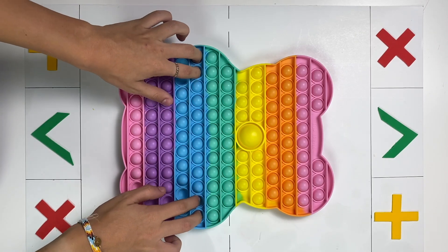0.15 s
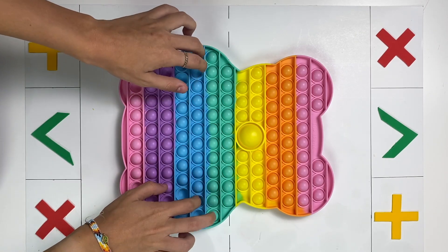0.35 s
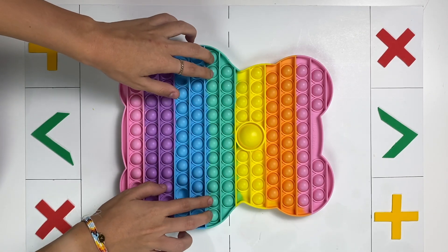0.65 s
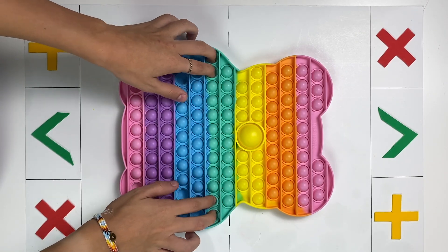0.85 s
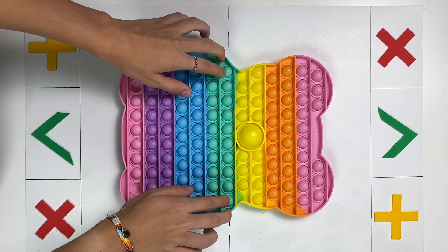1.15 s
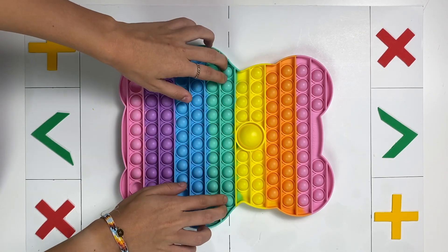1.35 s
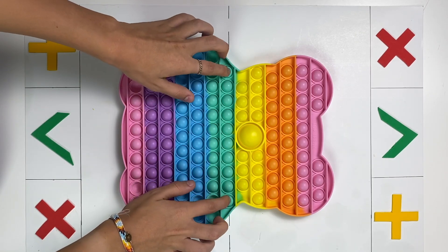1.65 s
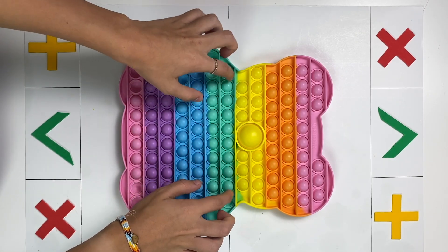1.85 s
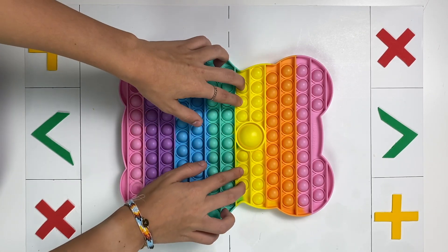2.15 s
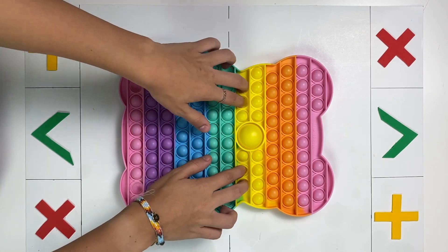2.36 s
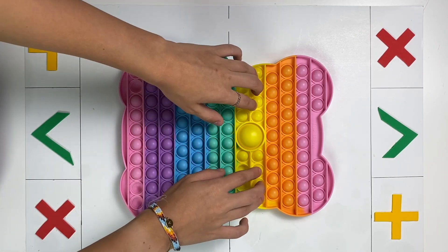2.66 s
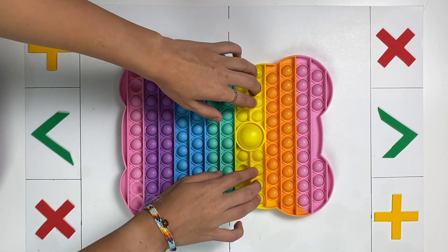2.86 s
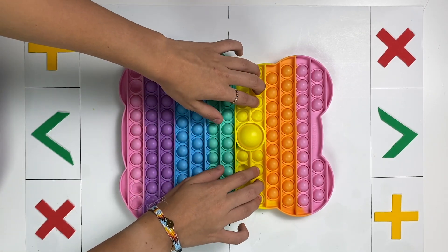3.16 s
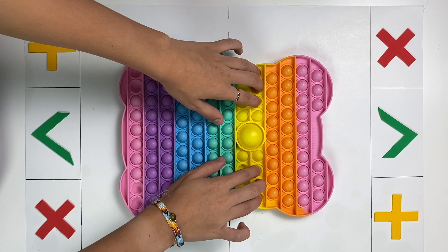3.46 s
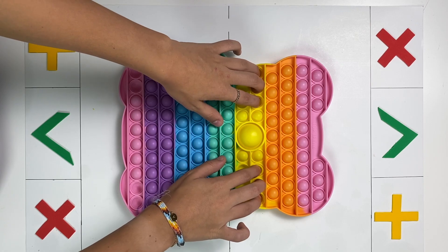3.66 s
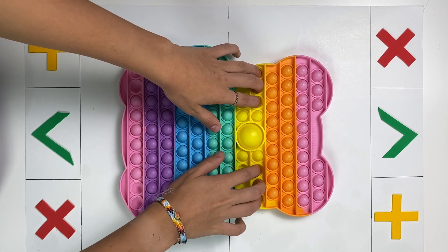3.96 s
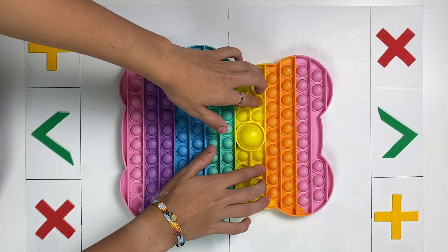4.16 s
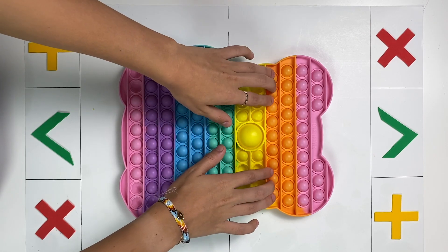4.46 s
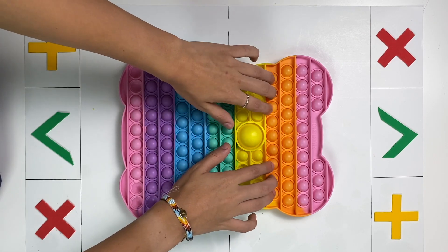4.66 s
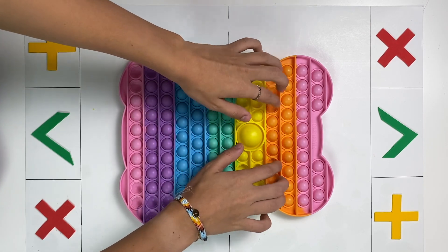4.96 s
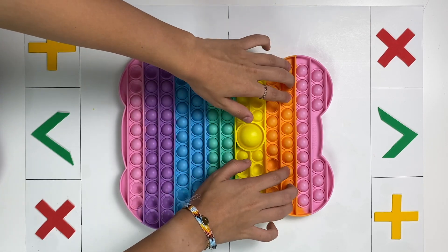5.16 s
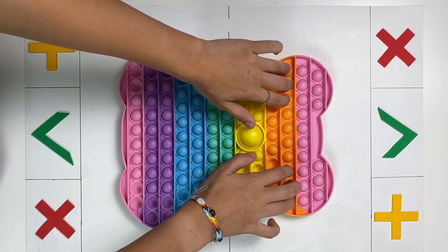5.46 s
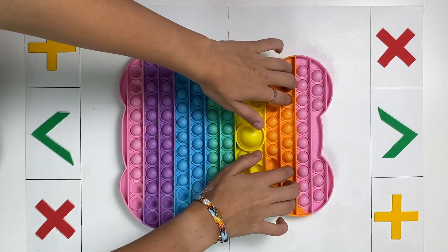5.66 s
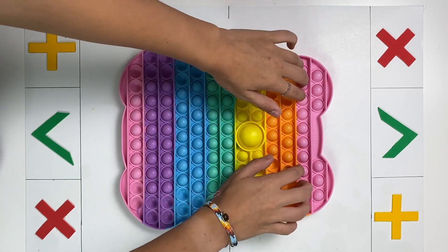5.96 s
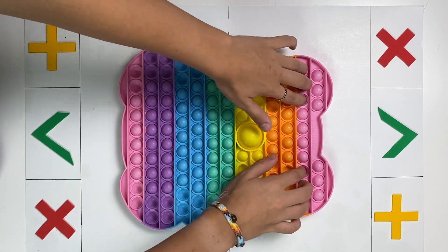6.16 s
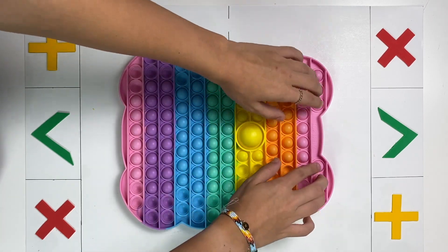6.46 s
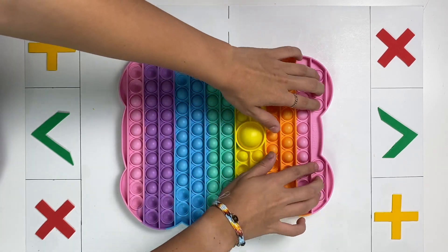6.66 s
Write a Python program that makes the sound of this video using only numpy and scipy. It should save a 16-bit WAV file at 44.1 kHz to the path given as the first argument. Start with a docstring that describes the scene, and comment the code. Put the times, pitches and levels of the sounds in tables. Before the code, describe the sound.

A quick run of three pops opens, then single snaps and small clusters follow unevenly as hands work across a rubber bubble sheet on a table. The pops are short, dry and hollow, with bright clicky edges and a brief small-room echo. Soft fingertip touches, tiny ticks and barely audible squeaks fill the gaps over a very quiet steady hum and hiss. Heard from close by in stereo.

```python
"""Pop-it toy in a small room

Two hands press the bubbles of a large silicone pop-it toy lying on a table. Each dome crackles as it
buckles, snaps through with a falling chirp (swept sine), rings its air pocket (damped sines) and thumps
the sheet (a sum of modes). Fingers tick, land and squeak on the rubber (shaped noise). A motor hums
faintly (wavering sines) over low rumble and hiss; decaying noise bands give the room's echo."""
import sys
import numpy as np
from scipy import signal
from scipy.fft import rfft, irfft
from scipy.io import wavfile
from scipy.ndimage import uniform_filter1d

SR = 44100
rng = np.random.default_rng(int(sys.argv[2]) if len(sys.argv) > 2 else 0)


def pcm_store(signal):
    """Save signal as 16-bit PCM."""
    levels = np.round(np.clip(np.atleast_2d(signal), -1, 1) * 32767)
    wavfile.write(sys.argv[1], SR, levels.astype(np.int16).T)


N = 300321  # length [samples]

# Levels in the tables are relative: most layers add an offset of their own.
# motor hum partials: (frequency [Hz], level [dB])
HUM = [(102.3, -61), (204.6, -72.5), (312.2, -86.5)]
# spectrum of the room's low rumble and hiss: (frequency [Hz], relative density [dB per Hz])
AIR = [(20, -26), (45, -24.5), (70, -9), (95, 4), (120, -14), (160, -13), (200, -11.5), (250, -18),
       (400, -26.5), (650, -32.5), (1000, -38.5), (2500, -48), (8000, -52.5), (16000, -58.5)]
# echo of the room by band: (frequency [Hz], level [dB], decay by 60 dB [s])
ROOM = [(100, -14, 0.59), (200, -8, 0.37), (350, -9, 0.45), (590, -6, 0.35), (1110, -2.5, 0.3),
        (1960, -5, 0.35), (3880, -6.5, 0.34), (8160, -6.5, 0.43), (15100, -8.5, 0.47)]
# fingertips shifting on the sheet between presses: (time [s], level [dB])
TOUCHES = [(.576, -52.5), (2.873, -54.5), (2.993, -58), (4.172, -65.5), (4.461, -61.5), (4.57, -57.5),
           (4.926, -44.5), (5.297, -49), (5.717, -45.5), (5.834, -56)]
# skin sliding on the rubber in faint squeaks:
# (time [s], length [s], centre [Hz], resonance width [Hz], level [dB])
RUBS = [(1.44, .13, 6680, 900, -83), (2.852, 0.027, 4970, 505, -75.5), (3.435, 0.23, 7710, 130, -62.5),
        (3.986, 0.071, 3384, 401.5, -79.5), (4.517, .1, 6620, 698, -79.5), (5.02, 0.08, 4770, 493, -86)]
# colour of a soft pad landing: (frequency [Hz], level [dB])
PAD = [(60, -21), (180, 4.5), (400, 3.5), (650, 3.5), (1100, -3.5), (1800, -16), (4000, -28), (12000, -42)]
# skin and nails ticking on the rubber: (time [s], level [dB])
TICKS = [(.061, -47), (.0874, -28), (.348, -53), (.577, -63), (1.033, -39), (4.12, -57), (4.752, -36),
         (4.927, -48.5), (5.717, -52.5), (6.616, -61.5)]
# colour of the rubber's crackle: (frequency [Hz], level [dB])
CRACKLE = [(500, -20), (1500, 5), (2800, -1), (3600, -1), (4400, 1), (5600, -5.5), (7200, 3.5), (9500, -7),
           (13000, -5), (16000, -11.5)]
# the hands take a new grip and press: (time [s], pad landing [dB], pitch of a firm snap [Hz],
# sheet thump [dB], upper ring relative to pocket ring [dB], extra crackle [dB])
PRESSES = [(.069, -34.5, 1350, -38, 4.5, 2.5), (.348, -64, 1400, -45.5, -3, -2),
           (.823, -40.5, 1300, -39, 3.5, 1), (1.033, -51, 1400, -33, -6, -11),
           (1.696, -43, 1341, -39, -3, 4), (2.338, -56.5, 1450, -43.5, -3.5, 0.5),
           (3.302, -60.5, 1400, -45, -7, 1), (3.721, -44, 1640, -37, -7.5, -0.5),
           (4.709, -47.5, 1620, -40.5, 2, -0.5), (5.494, -48.5, 1180, -35, -9.5, 1),
           (6.112, -43.5, 1230, -38.5, -4.5, 3.5)]
# domes snapping through: (time [s], snap level [dB], pocket ring level [dB], settled pocket pitch [Hz])
POPS = [(0.0775, -23.5, -31.5, 705), (0.1209, -21.5, -29, 617), (0.1689, -13, -24.5, 493),
        (.359, -44.5, -32, 620), (.832, -31, -41, 634), (.857, -11.5, -18, 620), (0.9142, -13, -26, 457),
        (1.0432, -27, -28, 577), (1.7285, -17, -30, 618), (2.3615, -26.5, -32, 496),
        (2.3826, -14, -26.5, 620), (2.395, -16, -27.5, 626), (3.3887, -30, -29, 555),
        (3.5065, -24, -34, 680), (3.5137, -20, -29.5, 471), (3.7243, -24.5, -35, 488),
        (3.7288, -16, -31, 467), (4.727, -31.5, -37.5, 616), (4.7574, -19, -24.5, 667),
        (4.7896, -17, -24.5, 642), (4.8192, -15.5, -30.5, 467), (5.497, -34, -45.5, 624),
        (5.505, -14.5, -29.5, 474), (5.5283, -13, -25.5, 678), (6.1197, -25.5, -27, 644),
        (6.1727, -15, -32.5, 510), (6.1766, -15.5, -29, 670), (6.1828, -21.5, -37.5, 785),
        (6.1922, -27.5, -28.5, 550)]
# colour of the dome's skin as it snaps: (frequency [Hz], level [dB])
SKIN = [(200, -1), (700, 0), (1100, 2), (1600, -1.5), (2100, -2), (2800, -0.5), (3600, 3.5), (4400, 7),
        (5000, 10), (5800, 1.5), (7500, 3), (12000, -3)]
# colour of the loose rubber shuddering around a flipped dome: (frequency [Hz], level [dB])
SHUDDER = [(150, -16), (500, -6), (900, -0.5), (2200, -1), (3200, -9), (6000, -24.5), (14000, -36.5)]
# modes of the sheet on the table: (frequency [Hz], level [dB], decay by 60 dB [s])
SHEET = [(152, -2.5, 0.13), (184, 2, 0.2), (271.5, 0.5, 0.16), (381.4, -3, 0.14), (450, 1, 0.08)]

AIR_DB = -61.5
TOP_HZ = 16000
LEAD_S = 0.006  # a dome creaks this long before it gives way
POCKET_T60_S, UPPER_T60_S = 0.023, 0.014  # ring times of the air pocket's two resonances
# a dome that snaps with FIRM_DB has this base crackle; a harder snap is higher and crackles more
FIRM_DB, CRACKLE_DB = -21, -32
SNAP_OCTAVES_PER_DB, CRACKLE_DB_PER_DB = 0.007, 0.79
# fainter random brushes of the fingers: level of the pad, level of the tick, and their spread either way
BRUSH_PAD_DB, BRUSH_TICK_DB, BRUSH_SPREAD_DB = -67, -75.5, 3


def undb(db):
    """Logarithmic level: 20 dB is a factor of ten in amplitude."""
    return 10 ** (np.asarray(db) / 20)


def seconds(length):
    """Sampling: a time axis [s] of the given length."""
    return np.arange(int(length * SR)) / SR


def add(track, at, sound):
    """Superposition: mix a sound into a track at a time, cut at the track's end."""
    start = int(at * SR)
    track[..., start:start + sound.shape[-1]] += sound[..., :track.shape[-1] - start]


def colour(x, points):
    """Linear filtering: weight a spectrum by (Hz, dB) points joined on a log frequency axis."""
    hz, db = np.transpose(points)
    f = np.maximum(np.fft.rfftfreq(len(x), 1 / SR), 1)
    gain = undb(np.interp(np.log(f), np.log(hz), db))
    return irfft(rfft(x) * gain, len(x))


def noise(points, size):
    """Coloured noise: white noise shaped by (Hz, dB) points and scaled to unit deviation."""
    x = colour(rng.standard_normal(size), points)
    return x / x.std()


def walk(rate):
    """Slow random modulation: levels held 1 / rate seconds, then smoothed twice."""
    hold = int(SR / rate)
    steps = np.repeat(rng.standard_normal(N // hold + 1), hold)
    x = uniform_filter1d(uniform_filter1d(steps, hold), hold)[:N]
    return x / x.std()


def damping(t, t60):
    """Exponential decay: the amplitude falls by 60 dB in t60 seconds."""
    return np.exp(-np.log(1000) * t / t60)


def background(hum_db, waver_db, air_db, side_db):
    """Tonal and broadband noise: a motor hum wavering in level and phase, over low rumble and hiss."""
    t = np.arange(N) / SR
    hum = np.zeros(N)
    for hz, db in HUM:
        level = undb(db + hum_db + waver_db * walk(5.6))
        hum += level * np.sin(2 * np.pi * hz * t + 0.27 * walk(10))
    rumble = noise(AIR, size=N)
    # only the upper part of the air noise differs between the channels
    high_pass = signal.butter(1, 1400, "high", fs=SR, output="sos")
    side = signal.sosfilt(high_pass, noise(AIR, size=N))
    return hum + undb(AIR_DB + air_db) * (rumble + undb(side_db) * side * np.array([[1], [-1]]))


def room(onset=0.00097, early_db=6, early_decay=0.018, alike_hz=900):
    """Reverberation: noise bands decay, strongest early from the table and near walls; bass is alike."""
    t = seconds(0.5)
    f = np.maximum(np.fft.rfftfreq(len(t), 1 / SR), 1)
    hz, db, t60 = np.transpose(ROOM)
    mid, side = rfft(rng.standard_normal((2, len(t))))
    apart = f / (f + alike_hz)
    ears = (mid + np.array([[1], [-1]]) * apart * side) / np.sqrt(1 + apart ** 2)
    build = (1 + undb(early_db) * np.exp(-t / early_decay)) * (1 - np.exp(-(t / onset) ** 2))
    echo = 0
    for k, share in enumerate(np.eye(len(ROOM))):
        fade = build * damping(t, t60[k])
        # overlapping triangular bands on a log frequency axis
        band = irfft(ears * np.interp(np.log(f), np.log(hz), share), len(t))
        echo = echo + undb(db[k]) * band * fade / np.sqrt(np.sum(fade ** 2))
    return echo


def ports(x, turn_hz=8300, width_hz=720):
    """Delay and all-pass: the right port hears one sample later, its phase turning at a resonance."""
    b, a = signal.iirpeak(turn_hz, turn_hz / width_hz, fs=SR)
    late = np.append(0, x[:-1])
    return np.array([x, late - 2 * signal.lfilter(b, a, late)])


def heard(x):
    """Radiation: the toy radiates little bass and reaches the ports directly and through the room."""
    radiated = signal.sosfilt(signal.butter(2, 105, "high", fs=SR, output="sos"), x)
    out = signal.fftconvolve(radiated[None], room(), axes=1)
    add(out, 0, ports(radiated))
    return out


def brushes(count):
    """Random arrivals: one light contact in each equal span, as (s, dB about the usual level)."""
    chance = rng.random((count, 2))
    contacts = []
    for k, (when, size) in enumerate(chance):
        contacts.append(((k + when) / count * N / SR, BRUSH_SPREAD_DB * (2 * size - 1)))
    return contacts


def pad(t, rise, decay):
    """Soft impact: dull noise that swells and dies exponentially."""
    return noise(PAD, size=len(t)) * (1 - np.exp(-t / rise)) * np.exp(-t / decay)


def squeak(length, hz, width):
    """Friction exciting a resonance: noise through two equal narrow filters, under a smooth swell."""
    size = len(seconds(length))
    b, a = signal.iirpeak(hz, hz / width, fs=SR)
    tone = signal.lfilter(b, a, signal.lfilter(b, a, rng.standard_normal(size)))
    return np.hanning(size) * tone / tone.std()


def fingers(touches):
    """Impact and friction: pads land dully on the sheet and skin slides over it."""
    out = np.zeros(N)
    t = seconds(0.1)
    for at, db in touches:
        add(out, at, undb(db) * pad(t, rise=0.003, decay=0.008))
    for at, length, hz, width, db in RUBS:
        add(out, at, undb(db) * squeak(length, hz, width))
    return heard(out)[:, :N]


def crackles(bursts, rise, decay, echo_db):
    """Adhesive release: rubber peels off rubber or skin in a brief bright burst at every pop and tick."""
    t = seconds(0.03)
    swell = np.exp(-np.maximum((LEAD_S - t) / rise, (t - LEAD_S) / decay))
    near, radiated = np.zeros((2, N))
    for at, db in bursts:
        add(near, max(at - LEAD_S, 0), undb(db) * swell * noise(CRACKLE, size=len(t)))
        # the room gathers the burst from all directions, so its spectrum evens out to one smooth click
        radiated[int(at * SR)] += undb(db + echo_db) * np.linalg.norm(swell)
    echo = signal.fftconvolve(colour(radiated, CRACKLE)[None], room(), axes=1)
    return ports(near) + echo[:, :N]


def ring(t, hz, t60, rise):
    """Damped resonance: a decaying sine that takes a moment to build."""
    return np.sin(2 * np.pi * hz * t) * damping(t, t60) * (1 - np.exp(-t / rise))


def sheet(t, spread_db):
    """Modal superposition: the sheet's modes, weighted and tuned a little anew at every strike."""
    chance = rng.standard_normal((len(SHEET), 2))
    out = np.zeros(len(t))
    for (hz, db, t60), (weight, tuning) in zip(SHEET, chance):
        out += undb(db + spread_db * weight) * ring(t, hz * (1 + 0.0099 * tuning), t60, rise=0.00045)
    return out


def pocket(t, hz, t60, rise, sag, sag_time):
    """Cavity resonance: the air under a dome starts sharp and settles as the dome comes to rest."""
    phase = 2 * np.pi * hz * (t + sag * sag_time * (1 - np.exp(-t / sag_time)))
    return np.sin(phase) * damping(t, t60) * (1 - np.exp(-t / rise))


def snap(t, hz, crest, decay, glide, sink):
    """Snap-through buckling: a chirp swells to its crest and falls in pitch as the pocket opens."""
    age = t - crest
    pitch = hz * (sink + (1 - sink) * np.exp(-age / glide))  # equals hz at the crest
    phase = 2 * np.pi * np.cumsum(np.minimum(pitch, SR / 4)) / SR
    attack = np.sin(np.pi / 2 * t / crest) ** 2
    release = 1 / np.cosh(np.clip(age / decay, 0, 20))
    swell = np.where(age < 0, attack, release)
    return swell * np.sin(phase - np.interp(crest, t, phase))


def pop(snap_db, snap_hz, pocket_db, pocket_hz, upper_db, thump_db):
    """Instability and free vibration: a dome creaks, snaps, rings its air and shakes the sheet."""
    t = seconds(0.25)
    flip = np.zeros(len(t))
    chirp = snap(t, snap_hz, crest=0.001034, decay=0.00045, glide=0.00041, sink=0.63)
    add(flip, LEAD_S - 0.0006, undb(snap_db + 1.0) * chirp)
    out = colour(flip, SKIN)
    # the fingertip covers each dome differently
    upper_hz = 1030 * (1 + 0.05 * rng.standard_normal())
    creak = pad(t, rise=0.0014, decay=0.025)
    add(out, LEAD_S / 4, undb(snap_db - 29.5) * creak)
    shudder = noise(SHUDDER, size=len(t)) * np.exp(-t / 0.0041)
    add(out, LEAD_S, undb(snap_db - 19.5) * shudder)
    lower_ring = pocket(t, pocket_hz, POCKET_T60_S, rise=0.0013, sag=0.088, sag_time=0.00043)
    add(out, LEAD_S, undb(pocket_db + 7.5) * lower_ring)
    upper_ring = pocket(t, upper_hz, UPPER_T60_S, rise=0.0002, sag=0.14, sag_time=0.0016)
    add(out, LEAD_S, undb(upper_db + 6) * upper_ring)
    add(out, LEAD_S, undb(thump_db - 5.5) * sheet(t, spread_db=3.0))
    add(out, LEAD_S, undb(thump_db + 5.5) * pad(t, rise=0.00055, decay=0.009))
    return out


def grip(at):
    """Boundary conditions: snap pitch, thump, upper ring and extra crackle of the press under way."""
    return [row[2:] for row in PRESSES if row[0] <= at + LEAD_S][-1]


def pops():
    """Position-dependent response: the grip sets each dome's shake, its spot a pattern of echoes."""
    out = np.zeros((2, N))
    for at, snap_db, pocket_db, pocket_hz in POPS:
        firm_hz, thump_db, upper_db, _ = grip(at)
        snap_hz = firm_hz * 2 ** (SNAP_OCTAVES_PER_DB * (snap_db - FIRM_DB))
        dome = pop(snap_db, snap_hz, pocket_db, pocket_hz, pocket_db + upper_db, thump_db)
        add(out, at - LEAD_S, heard(dome))
    return out


def scene():
    """Superposition of sources: the toy close by, and the room's hum and air."""
    light = brushes(count=12)
    landings = [row[:2] for row in PRESSES]
    touches = landings + list(TOUCHES) + [(at, BRUSH_PAD_DB + db) for at, db in light]
    peels = []
    for at, snap_db, *_ in POPS:
        harder_db = CRACKLE_DB_PER_DB * (snap_db - FIRM_DB)
        peels.append((at, CRACKLE_DB + grip(at)[-1] + harder_db))
    ticks = list(TICKS) + [(at, BRUSH_TICK_DB + db) for at, db in light]
    toy = pops() + crackles(peels + ticks, rise=0.00041, decay=0.0015, echo_db=2.0) + fingers(touches)
    return toy + background(hum_db=0.5, waver_db=1.66, air_db=-2, side_db=4.0)


def record(dry):
    """Band limiting: the recorder's steep elliptic low-pass cuts the top."""
    return signal.sosfilt(signal.ellip(8, 0.2, 70, TOP_HZ, fs=SR, output="sos"), dry)


dry = scene()
out = record(dry)
pcm_store(out)
```